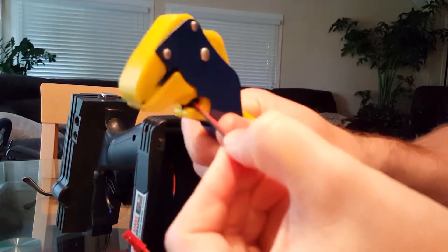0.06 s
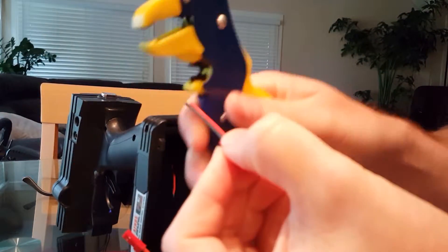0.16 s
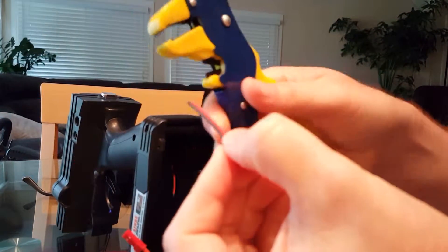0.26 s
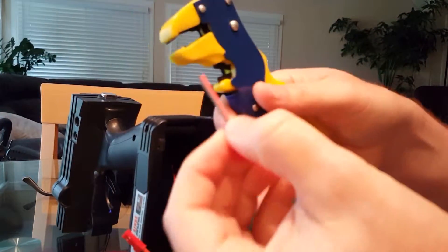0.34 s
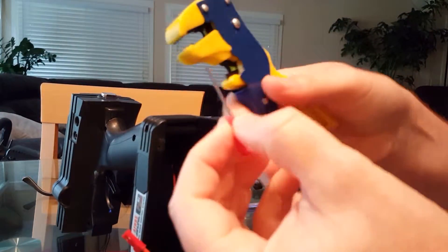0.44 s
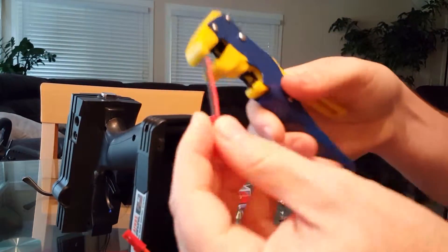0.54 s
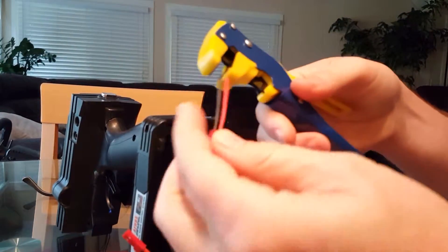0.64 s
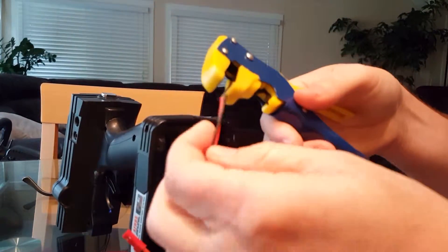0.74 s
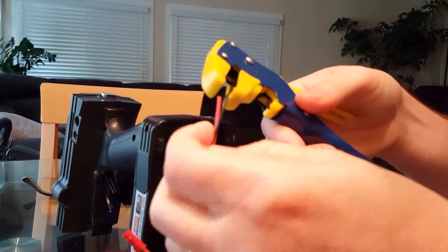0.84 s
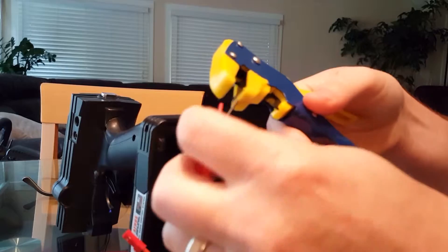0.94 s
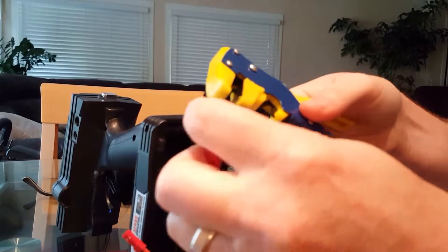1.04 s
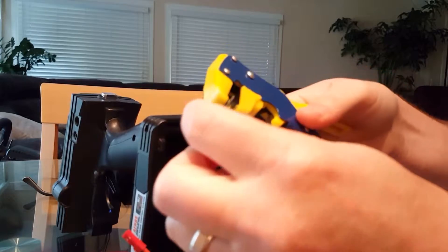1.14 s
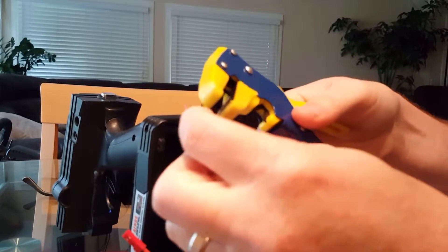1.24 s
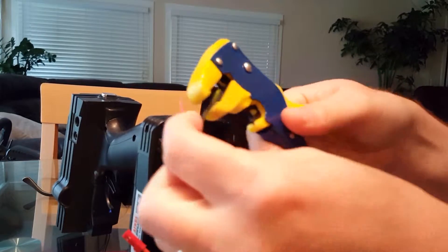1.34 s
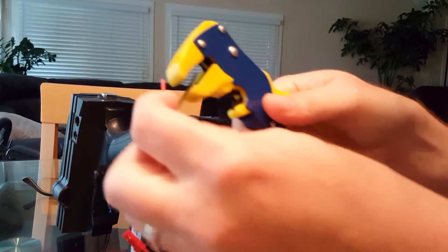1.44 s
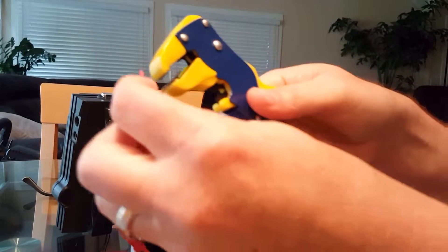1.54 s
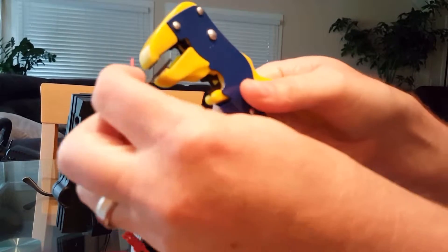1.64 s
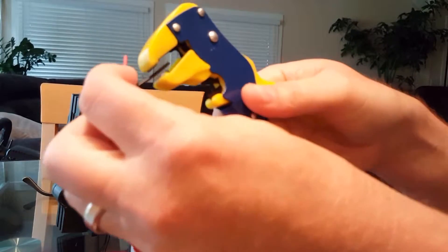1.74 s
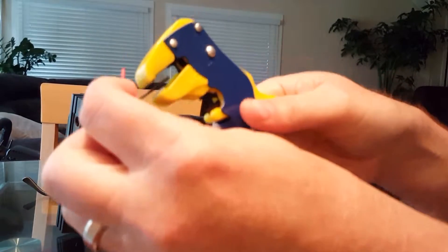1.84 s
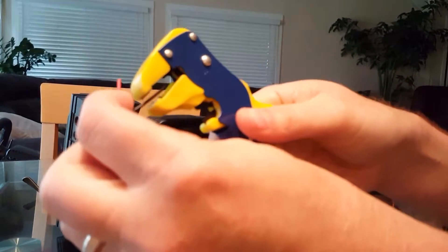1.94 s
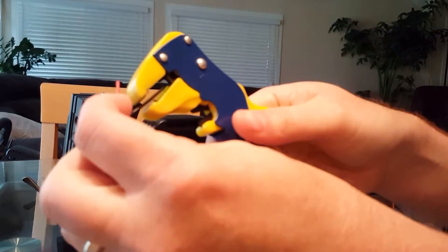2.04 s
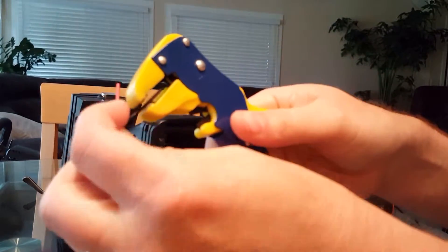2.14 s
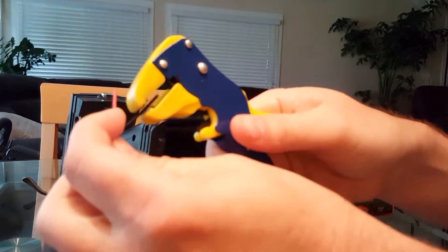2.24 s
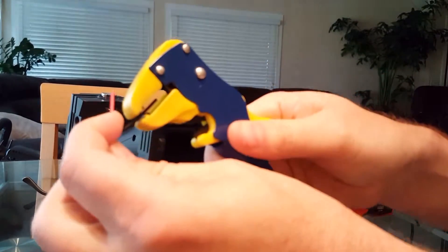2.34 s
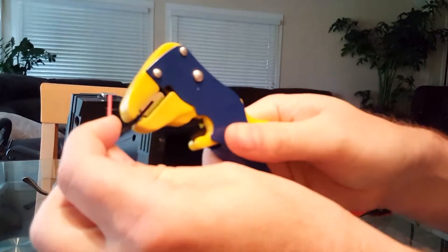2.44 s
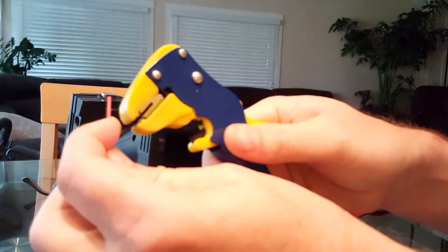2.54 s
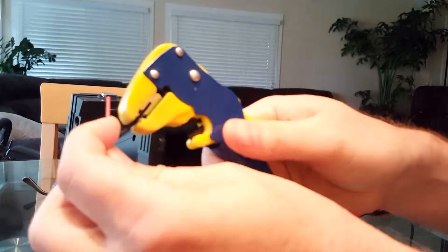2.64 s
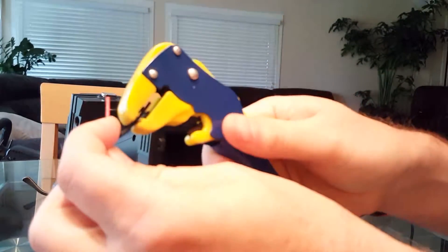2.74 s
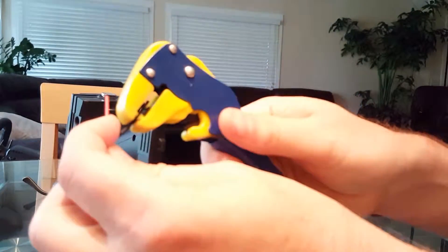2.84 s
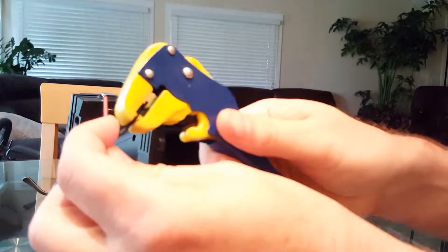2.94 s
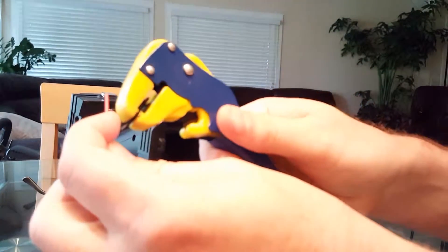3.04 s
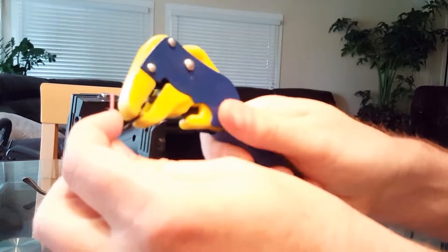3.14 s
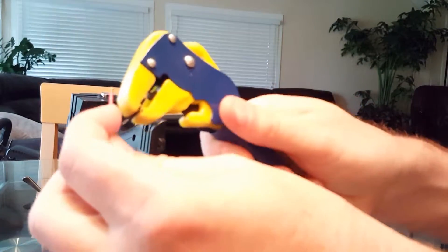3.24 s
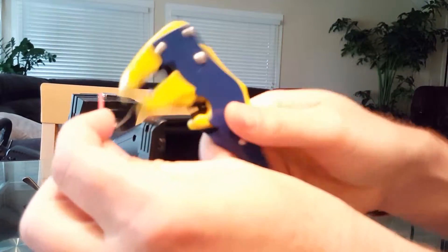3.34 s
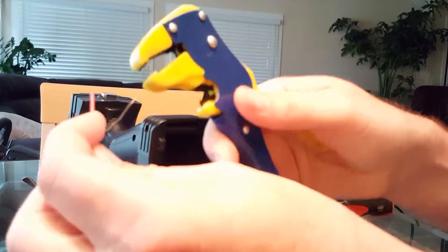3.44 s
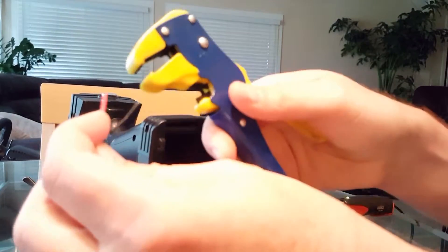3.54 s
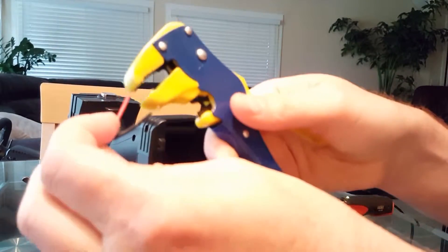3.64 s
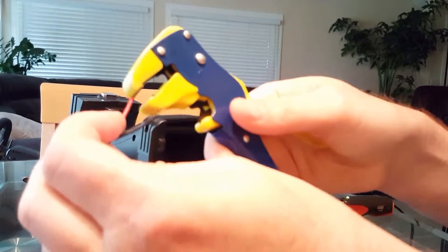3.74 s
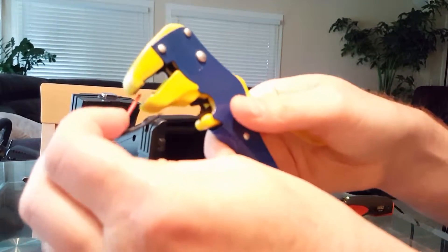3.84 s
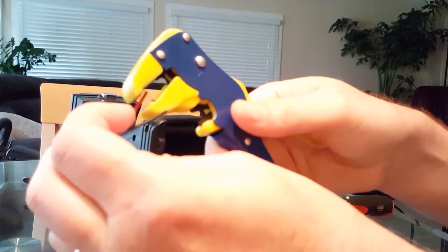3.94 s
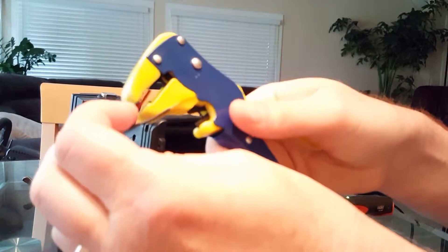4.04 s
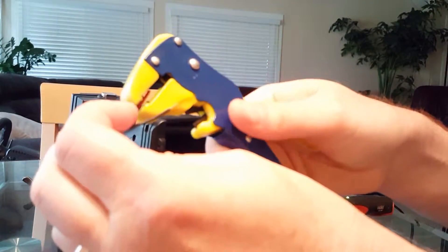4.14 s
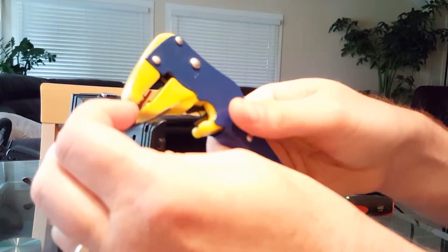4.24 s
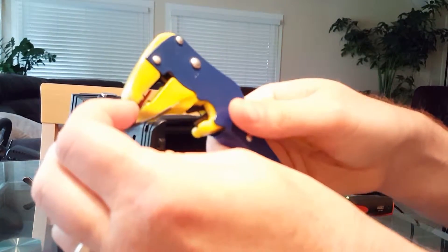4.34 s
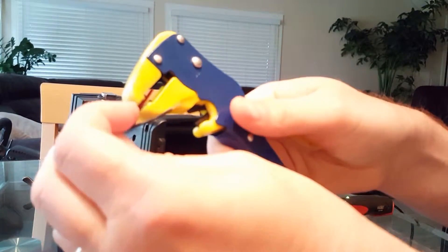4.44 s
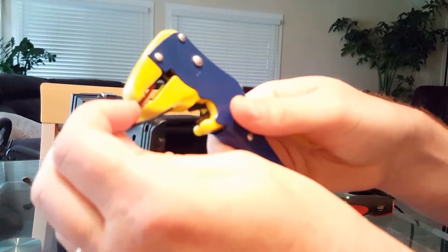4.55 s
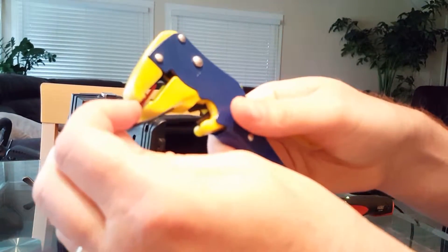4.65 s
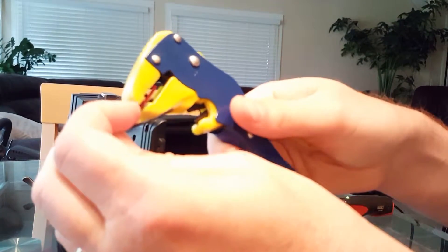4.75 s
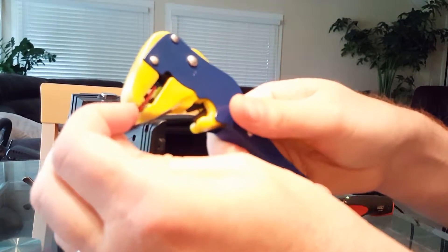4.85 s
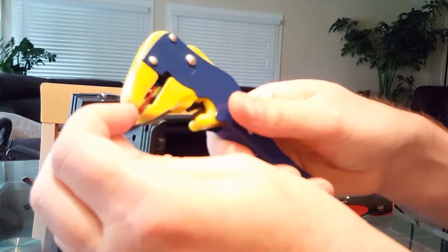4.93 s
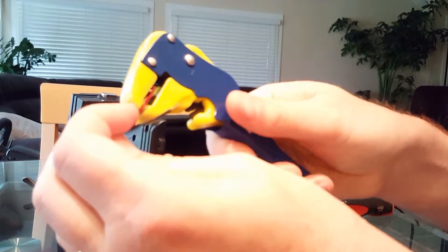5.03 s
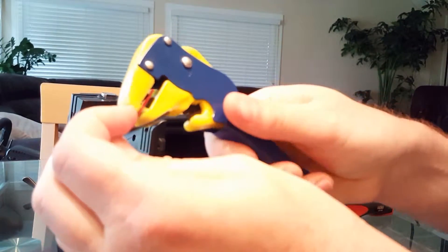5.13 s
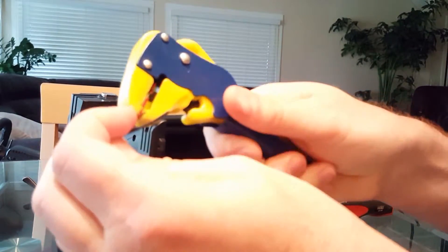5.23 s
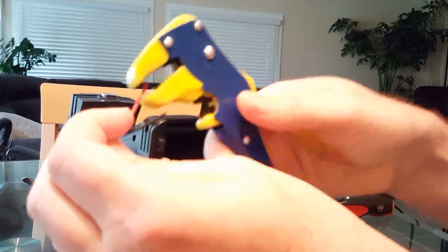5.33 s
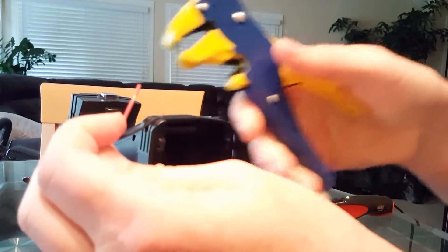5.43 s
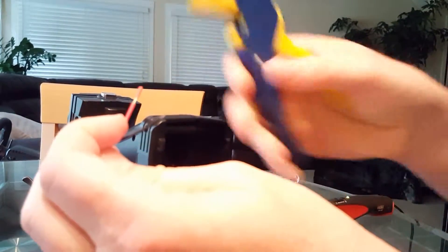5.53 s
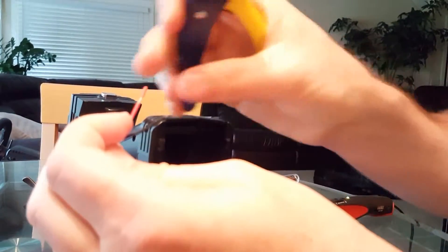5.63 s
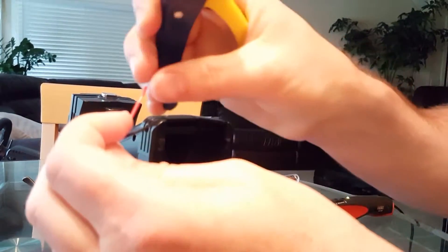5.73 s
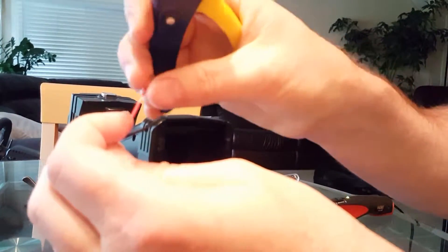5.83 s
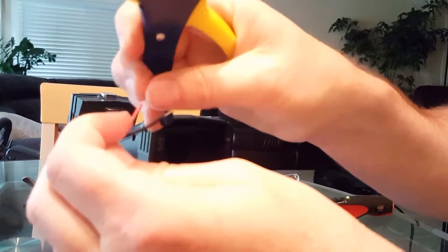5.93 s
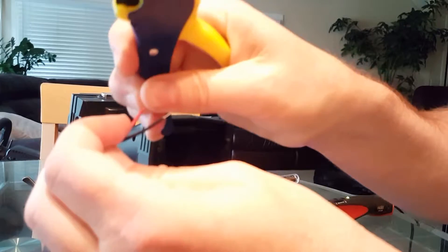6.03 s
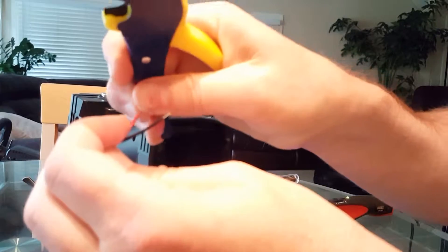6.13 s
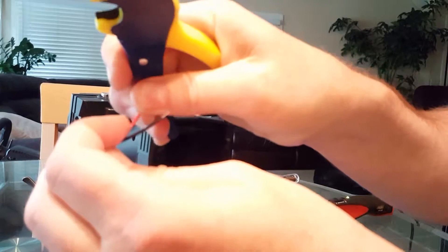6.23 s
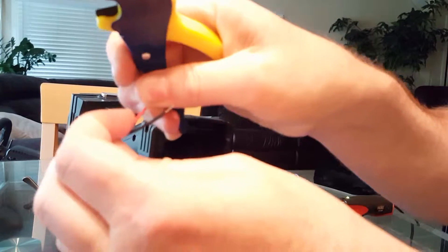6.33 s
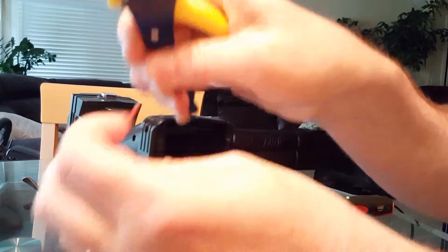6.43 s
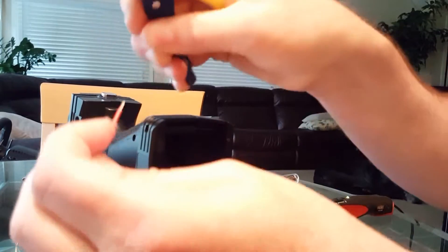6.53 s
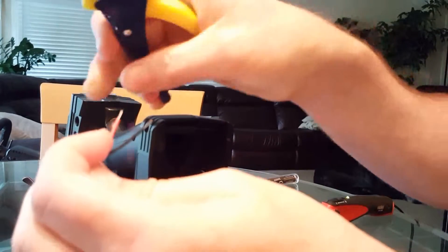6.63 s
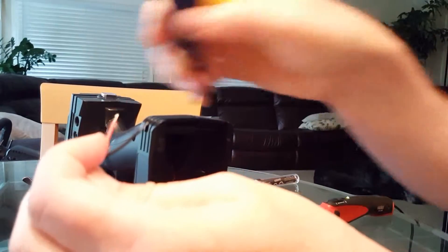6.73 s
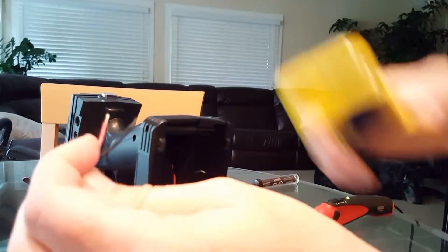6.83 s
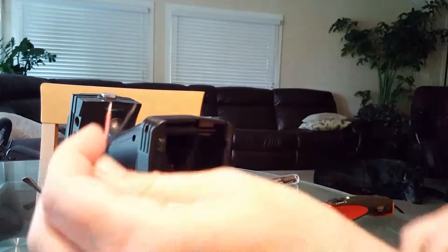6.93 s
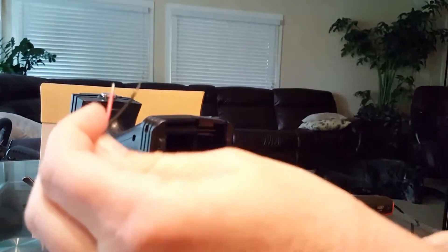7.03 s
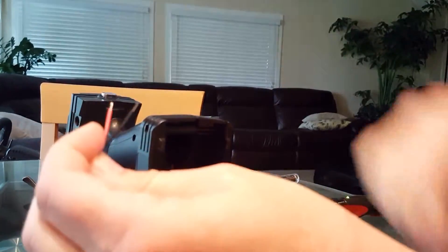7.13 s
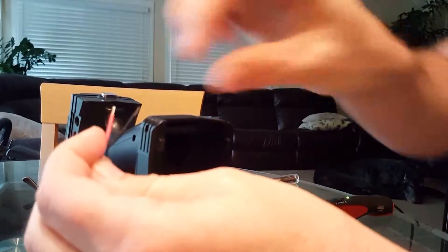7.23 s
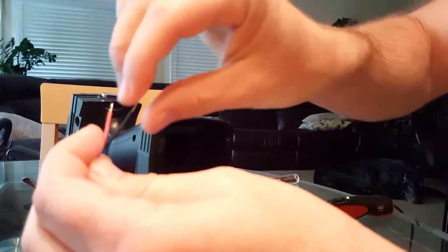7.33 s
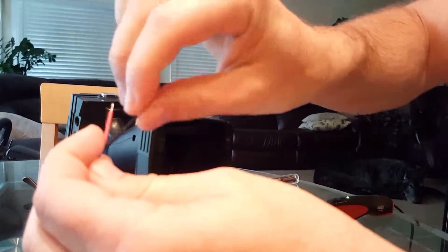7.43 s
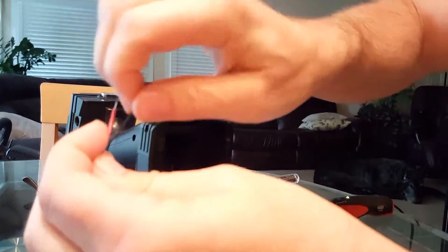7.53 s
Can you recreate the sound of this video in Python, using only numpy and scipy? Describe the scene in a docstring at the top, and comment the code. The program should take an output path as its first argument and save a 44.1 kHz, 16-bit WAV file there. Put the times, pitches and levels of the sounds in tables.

```python
"""A quiet living room, heard close up: a self-adjusting wire stripper is worked over a soft ventilation rush.
Its jaws snap through the insulation; on release a pivot squeaks, lets go, and the spring slaps them open.
Then the tool is dropped on a glass table, where it clatters and something loose rocks to rest.
Contacts are pushes with filtered noise, ringing parts are decaying sines, rubbing is a swarm of tiny slips,
the squeak is a wavering tone, and the room is a burst of early bounces with a short noise tail."""
import sys
import numpy as np
from scipy import signal
from scipy.fft import rfft, irfft
from scipy.io import wavfile
from scipy.ndimage import uniform_filter1d

SR = 44100
rng = np.random.default_rng(int(sys.argv[2]) if len(sys.argv) > 2 else 0)


def dump_mix(stems):
    """Bounce the given channels to the path in sys.argv[1] as a 16-bit WAV at rate SR."""
    frames = np.atleast_2d(stems).T  # one column per channel
    limited = np.clip(frames, -1, 1)  # hard clip at full scale
    pcm = np.round(limited * 32767).astype(np.int16)
    wavfile.write(sys.argv[1], SR, pcm)


N = 334278  # length of the scene in samples
T = np.arange(SR // 2) / SR  # time axis of one short sound, s
EDGE_HZ = 16000

# All levels are relative settings that the mix builds on; colours are spectral shapes.
# spectrum of the ventilation rush: (frequency [Hz], level [dB])
AIR_COLOUR = [(15, -49.5), (25, -14.5), (80, -12.5), (97, -11), (130, -9), (229, -6), (263, -2.5),
              (301, -5.5), (439, -9), (516, -8.5), (677, -11), (1040, -13.5), (1840, -21.5), (4140, -26.5),
              (16000, -38)]
AIR_DB = -65
# blurred ventilation hums: (frequency [Hz], width [Hz], level [dB])
VENTILATION_HUMS = [(106, 6.7, -79), (272, 37, -74), (390, 50, -78), (508, 48, -76)]
# how alike sound from all sides is in both channels: (frequency [Hz], left-right coherence [-1..1])
STEREO_LIKENESS = [(60, 0.53), (290, 0.97), (640, 0.76), (1400, -0.067), (2500, -.12), (6000, 0)]

# the grip shifts; the linkage ticks, then fingers and wire scuff along the tool:
# (time [s], tick level [dB], scuff length [s], scuff level [dB])
GRIP_SHIFTS = [(.049, -34, 0.13, -21.5), (1.429, -40.5, .06, -39), (4.549, -44, 0.022, -50.5),
               (6.494, -44.5, 0.019, -43), (6.762, -42.5, 0.19, -40.5)]
# spectrum of the small ticks: (frequency [Hz], level [dB])
TICK_COLOUR = [(200, -12.5), (1500, -4), (4000, 1), (8000, -4), (11000, -8.5), (16000, -8)]
# left-right tilt of the near tool, before each side takes its share: (frequency [Hz], left over right [dB])
NEAR_BALANCE = [(400, -1), (2900, 3), (4100, -7), (5700, 0), (7300, -6.5), (9500, -1), (15000, -5.5)]

# the jaws bite through: (time [s], level [dB], shell ring level [dB], recoil thud level [dB])
BITES = [(.0603, -14, -25.5, -44), (3.1735, -2.5, -11, -31), (5.2716, -4, -9, -24.5)]
# spectrum of the bite: (frequency [Hz], level [dB])
BITE_COLOUR = [(71, -44), (120, -19), (473, -8), (856, -18.5), (1720, -11), (2870, -11.5), (3450, -9.5),
               (4230, -2), (5300, -12), (6910, -4), (8140, -14.5), (8840, -11), (11100, -13), (14400, -20),
               (16000, -16)]

# loose steel parts clack together: (time [s], contact level [dB], rattle level [dB])
CLACKS = [(0.1267, -5.5, -20.5), (0.241, -22.5, -23.5), (.290, -48, -27), (.320, -24, -23.5),
          (.381, -54, -30), (6.782, -45, -38.5)]
# spectrum of the clack contact: (frequency [Hz], level [dB])
CLACK_COLOUR = [(88, -57.5), (150, -37), (466, -24.5), (637, -36), (774, -17.5), (1060, -34.5), (2060, -4),
                (2500, -25), (3350, -1.5), (5050, -15), (5460, -11), (10400, -7.5), (16000, -19.5)]
# spectrum of the loose parts, rattling or rubbing: (frequency [Hz], level [dB])
LOOSE_PARTS_COLOUR = [(200, -11), (750, -3), (1050, -5.5), (1400, 0), (2000, -2.5), (3000, -1), (3700, 1),
                      (5000, 1), (7000, -8.5), (11000, -9), (16000, -12.5)]
# what the steel parts ring with: (frequency [Hz], level [dB], 60 dB decay time [s])
STEEL_MODES = [(1400, -8, .1), (2590, -3, .12), (3545, -2, .1), (4658, 1, .095), (4753, -1, .11),
               (5100, -6, .11), (5809, -8, .13), (7036, -4, .08), (7962, -8, .1), (8399, -5, .1),
               (9855, -6, .11)]
# each clack rings the steel, and the parts slide on for a moment
STEEL_OVER_RATTLE_DB, SLIDE_OVER_RATTLE_DB, SLIDE_S = -1.5, -10, .11

# the spring throws the jaws open:
# (time [s], level [dB], shell ring level [dB], time since the pivot let go [s], squeak level [dB])
RETURNS = [(0.2207, -2, -7.5, 0.027, -45.5), (3.4303, -1.5, -6.5, .020, -48),
           (5.4040, -1, -8.5, .015, -46.5)]
# spectrum of the jaws hitting their stop: (frequency [Hz], level [dB])
RETURN_COLOUR = [(71, -53.5), (120, -20.5), (968, -25.5), (1750, -21.5), (2700, -24), (3170, -12.5),
                 (3520, -7), (3980, -5.5), (5630, -1), (6500, -11), (7350, -2), (11500, -16.5),
                 (12500, -11.5), (13600, -17), (16000, -9.5)]
# before each return the pivot squeaks, then lets go with a tick
SQUEAK_HZ, SQUEAK_LEAD_S, LET_GO_OVER_SQUEAK_DB = 1370, .003, 24.5

# the tool lands on the table: (time [s], tool clatter level [dB], glass level before its overall boost [dB],
# dull knock level [dB], time between rebounds [s], loss per rebound [dB])
LANDINGS = [(6.9952, 0.5, -4.5, -7, 0.0087, 6.5), (7.158, -20.5, -7.5, -13.5, .01, 11),
            (7.1638, -0.5, 3.5, -12, .0048, 2.5)]
# spectrum of the tool's clatter: (frequency [Hz], level [dB])
TOOL_COLOUR = [(50, -29.5), (130, -16.5), (250, -12.5), (480, -12.5), (800, -9), (1100, -4.5), (1750, -9),
               (2400, -14.5), (3400, -10), (5000, -1), (7000, -13.5), (10000, -9), (12500, -15),
               (16000, -20.5)]
# spectrum of the glass chatter: (frequency [Hz], level [dB])
GLASS_COLOUR = [(100, -29.5), (500, -18.5), (800, -6), (1300, -1), (1850, 4), (2400, -1.5), (2900, 3.5),
                (4200, -11.5), (7000, -6.5), (11000, -30.5), (16000, -28)]
# spectrum of the dull table knock: (frequency [Hz], level [dB])
KNOCK_COLOUR = [(60, -22), (180, -8), (330, -0.5), (500, 1), (800, -4), (2000, -17), (16000, -49)]
# what the glass top rings with: (frequency [Hz], level [dB], 60 dB decay time [s])
GLASS_MODES = [(587, -9, .2), (780, -4, .14), (911, -4, .14), (1077, -5, .14), (1251, 1.5, .23),
               (1514, -4, .13), (1704, 2, .12), (1783, 6, .09), (1950, 1, .07), (2107, -2, .12),
               (2202, -6, .13), (2586, -4, .12), (2785, -3, .21), (2856, 2, .13), (3140, -2, .13),
               (3570, 0, .12)]
GLASS_BOOST_DB = 1.5

# what the loose piece rings with: (frequency [Hz], level [dB], 60 dB decay time [s])
ROCK_MODES = [(1715, -2, 0.029), (1754, 1, 0.047), (2000, -6.5, 0.027), (2125, -10.5, 0.035),
              (2620, -16, 0.034), (3630, -23, .04)]
# it rocks on the glass: each swing is shorter and weaker by a fixed share, until it settles flat
ROCK_START_S, ROCK_FIRST_SWING_S, ROCK_SWING_SHARE = 7.3398, .0548, .714
ROCK_DB, ROCK_LOSS_DB, SETTLE_DB = -24, 3.5, -40
ROCK_RISE_S = 0.001  # small and soft, so its knocks start gently

# how long the room tail lasts: (frequency [Hz], 60 dB decay time [s])
ROOM_T60 = [(100, 0.21), (400, 0.18), (1500, 0.18), (5500, 0.22), (10000, .2), (16000, .17)]
# spectrum of the room tail: (frequency [Hz], level [dB])
ROOM_COLOUR = [(100, -5.5), (500, -3), (1800, -2), (3300, -2), (6000, -3), (9000, -3.5), (15000, 0.5)]
# spectrum of the early bounces: (frequency [Hz], level [dB])
BOUNCE_COLOUR = [(100, -7.5), (500, -6.5), (1100, -7), (1800, -9), (3000, -4.5), (3800, 2), (5000, -6.5),
                 (9000, -6), (15000, -8.5)]


def amp(db):
    """Decibels to gain."""
    return 10 ** (np.asarray(db) / 20)


def unit(x):
    """Scales each channel to energy 1."""
    return x / np.sqrt(np.sum(x ** 2, axis=-1, keepdims=True) + 1e-20)


def read(points, hz):
    """Reads a table joined by straight lines on a log-frequency axis."""
    f, value = np.transpose(points)
    return np.interp(np.log(hz + 1), np.log(f + 1), value)


def bins(x):
    """Frequencies of the spectrum of x."""
    return np.fft.rfftfreq(x.shape[-1], 1 / SR)


def add(mix, s, sound):
    """Lays a sound into the mix at time s, cutting it at the end."""
    part = mix[:, round(s * SR):][:, :sound.shape[-1]]
    part += sound[..., :part.shape[-1]]


def tint(x, colour, power=1, size=4096):
    """Minimum-phase filter with the given spectrum, so that attacks stay sharp; power scales its dB."""
    hz = abs(np.fft.fftfreq(size, 1 / SR))
    log_gain = power * np.log(amp(np.maximum(read(colour, hz), -90)))
    spectrum = np.exp(np.conj(signal.hilbert(log_gain)))
    taps = np.fft.ifft(spectrum).real[:size // 2]
    return signal.oaconvolve(x, taps[None], axes=1)[:, :x.shape[-1]]


def band(x, hz, width):
    """One resonance of the given width in Hz."""
    return unit(signal.lfilter(*signal.iirpeak(hz, hz / width, fs=SR), x))


def diffuse(x):
    """Sound from all sides: blends two independent signals to the tabled left-right likeness."""
    a, b = rfft(x)
    angle = np.arccos(np.clip(read(STEREO_LIKENESS, bins(x)), -1, 1)) / 2
    shared, opposed = np.cos(angle) * a, np.sin(angle) * b
    return irfft([shared + opposed, shared - opposed], x.shape[-1])


def diffuse_noise(length):
    """White noise from all sides."""
    return diffuse(rng.standard_normal((2, length)))


def chatter(t60):
    """Countless small resonances dying together, as decaying noise."""
    return unit(diffuse_noise(len(T)) * amp(-60 * T / t60))


def snap(colour, t60, buzz_db, buzz_hz=2200):
    """One hard contact: a single push, and a brief buzz of the small parts above buzz_hz."""
    buzz = signal.lfilter(*signal.butter(2, buzz_hz, "high", fs=SR), chatter(t60))
    contact = signal.unit_impulse(len(T)) + amp(buzz_db) * buzz
    # the contact feeds all frequencies evenly; the colour belongs to the struck part
    power = uniform_filter1d(np.mean(abs(rfft(contact)) ** 2, axis=0), size=150)
    flattening = np.column_stack([bins(contact), -10 * np.log10(power + 1e-9)])
    return unit(tint(tint(contact, flattening), colour))


def ring(modes, blows, rise=0.0004, lag=0.00015):
    """Modes fed by blows (s, dB): energies pile up and drain away; the left waves lag in phase."""
    start = blows[0][0]
    t = np.arange(round((blows[-1][0] - start) * SR) + len(T)) / SR
    feed = np.zeros(len(t))
    for s, db in blows:
        feed[round((s - start) * SR)] += amp(db) ** 2
    supply = signal.lfilter([1], [1, -np.exp(-1 / (rise * SR))], feed)
    ear_time = t - np.array([[lag], [0]])  # left, right
    out = np.zeros((2, len(t)))
    for hz, db, t60 in modes:
        keep_per_sample = amp(-120 / (t60 * SR))  # an energy share, hence 120 for 60 dB
        energy = signal.lfilter([1], [1, -keep_per_sample], supply + 1e-30)
        out += amp(db) * np.sqrt(energy) * np.sin(2 * np.pi * (hz * ear_time + rng.random()))
    return np.sqrt(feed.sum()) * unit(out)


def air():
    """Steady ventilation rush of shaped noise, with hums of narrow noise bands."""
    noise = diffuse_noise(N)
    hz = bins(noise)
    out = amp(AIR_DB) * unit(irfft(rfft(noise) * amp(read(AIR_COLOUR, hz)), N))
    for centre, width, db in VENTILATION_HUMS:
        resonance = 1 / (1 + ((hz - centre) / width * 2) ** 2)
        out += amp(db) * unit(irfft(rfft(diffuse_noise(N)) * resonance, N))
    return np.sqrt(N) * out  # from energy 1 to RMS 1


def ticks():
    """The linkage ticks as the grip shifts, and the pivot ticks as it lets go before each return."""
    out = np.zeros((2, N))
    grips = [(s, db) for s, db, *_ in GRIP_SHIFTS]
    let_go = [(s - travel, db + LET_GO_OVER_SQUEAK_DB) for s, _, _, travel, db in RETURNS]
    for s, db in grips + let_go:
        add(out, s, amp(db) * snap(TICK_COLOUR, t60=0.018, buzz_db=12.0))
    return out


def scuffs(per_s=2000, spread_db=1.5):
    """Rubbing is a swarm of tiny slips, a few of them larger, sounding through the loose parts."""
    out = np.zeros((2, N))
    rubs = [(s, length, db) for s, _, length, db in GRIP_SHIFTS]
    slides = [(s, SLIDE_S, db + SLIDE_OVER_RATTLE_DB) for s, _, db in CLACKS]
    for s, length, db in rubs + slides:
        sizes = amp(spread_db * np.minimum(rng.exponential(1, len(T)), 4))
        slips = (rng.random(len(T)) < per_s / SR) * sizes
        swell = np.sin(np.pi * np.minimum(T / length, 1))
        rub = diffuse(rng.standard_normal((2, len(T))) * slips * swell)
        add(out, s, amp(db) * unit(tint(rub, LOOSE_PARTS_COLOUR)))
    return out


def bites():
    """The jaws snap through the insulation: a hard contact, and a low resonant thud as the hands jerk."""
    out = np.zeros((2, N))
    for s, db, _, thud_db in BITES:
        add(out, s, amp(db) * snap(BITE_COLOUR, t60=0.011, buzz_db=8.0))
        thud = band(band(chatter(t60=.3), hz=110, width=120), hz=110, width=120)
        add(out, s, amp(thud_db) * thud)
    return out


def shell():
    """The plastic housing rings low with shut jaws and higher with open ones, as pushed resonances."""
    out, push = np.zeros((2, N)), signal.unit_impulse(len(T))
    shut = band(band(push, hz=3620, width=900), hz=3620, width=900)
    overtone = amp(-8) * band(band(push, hz=6500, width=1100), hz=6500, width=1100)
    opened = band(band(push, hz=5840, width=1100), hz=5846, width=1100)
    for s, _, db, _ in BITES:
        add(out, s, amp(db) * (shut + overtone))
    for s, _, db, *_ in RETURNS:
        add(out, s, amp(db) * opened)
    return out


def clacks():
    """Loose steel parts knock together: a hard contact, a noisy rattle and ringing steel modes."""
    out = np.zeros((2, N))
    for s, db, rattle_db in CLACKS:
        add(out, s, amp(db) * snap(CLACK_COLOUR, t60=.016, buzz_db=8.5))
        rattle = unit(tint(chatter(t60=0.12), LOOSE_PARTS_COLOUR))
        steel = ring(STEEL_MODES, [(s, STEEL_OVER_RATTLE_DB)])
        add(out, s, amp(rattle_db) * (rattle + steel))
    return out


def squeak(hz, rise=0.0033, fall=.006, glide=3., waver=.025):
    """A short stick-slip tone that swells and rises in pitch, loudest in its middle."""
    t = np.arange(-SR // 20, SR // 20) / SR
    wander = uniform_filter1d(rng.standard_normal(len(t)), size=60)
    pitch = hz * (1 + glide * t + waver * wander / wander.std())
    swell = np.exp(np.minimum(t / rise, -t / fall))
    return swell * np.sin(2 * np.pi * np.cumsum(pitch) / SR)


def squeaks():
    """The pivot sticks and slips just before it lets go, one tone per return."""
    out = np.zeros((2, N))
    for s, _, _, travel, db in RETURNS:
        tone = squeak(SQUEAK_HZ)
        loudest_s = s - travel - SQUEAK_LEAD_S
        add(out, loudest_s - len(tone) / 2 / SR, amp(db) * tone)
    return out


def returns(lead=.001):
    """The spring slaps the jaws open: the slide touches first, then the jaw hits its stop."""
    out = np.zeros((2, N))
    for s, db, *_ in RETURNS:
        add(out, s - lead, amp(db - 10) * snap(RETURN_COLOUR, t60=0.0048, buzz_db=10))
        add(out, s, amp(db) * snap(RETURN_COLOUR, t60=0.011, buzz_db=-1.5))
    return out


def stripper():
    """The tool in the hand, near the right microphone: its hard contacts are tilted between the sides."""
    contacts = ticks() + bites() + returns()
    left = tint(contacts[:1], NEAR_BALANCE, power=.5)
    right = tint(contacts[1:], NEAR_BALANCE, power=-0.37)
    return np.vstack([left, right]) + clacks() + squeaks() + scuffs()


def rebounds(count=4):
    """Each landing chatters in evenly spaced, weakening contacts: rows (s, tool dB, glass dB, knock dB)."""
    contacts = []
    for s, tool_db, glass_db, knock_db, gap, loss_db in LANDINGS:
        for k in range(count):
            lost = k * loss_db
            contacts.append((s + k * gap, tool_db - lost, glass_db + GLASS_BOOST_DB - lost, knock_db - lost))
    return sorted(contacts)


def landings():
    """Each contact knocks the table, shakes the tool and rings the glass: coloured noise, snaps and modes."""
    out = np.zeros((2, N))
    contacts = rebounds()
    for s, tool_db, glass_db, knock_db in contacts:
        clatter = unit(tint(chatter(t60=0.076), TOOL_COLOUR))
        tool = clatter + amp(-13) * snap(TOOL_COLOUR, t60=.01, buzz_db=-3.0)
        glass = unit(tint(chatter(t60=0.062), GLASS_COLOUR))
        knock = snap(KNOCK_COLOUR, t60=0.031, buzz_db=7.5, buzz_hz=200)
        add(out, s, amp(tool_db) * tool + amp(glass_db) * glass + amp(knock_db) * knock)
    s, tool_db, glass_db, _ = np.transpose(contacts)
    add(out, s[0], amp(-4.0) * ring(STEEL_MODES, np.column_stack([s, tool_db])))
    add(out, s[0], ring(GLASS_MODES, np.column_stack([s, glass_db])))
    return out


def rocking(count=9):
    """A loose piece rocks on the glass: knocks come ever faster and fainter, then a last one as it lies flat."""
    duration = ROCK_FIRST_SWING_S / (1 - ROCK_SWING_SHARE)  # sum of the endless series of swings
    knocks = [(ROCK_START_S + duration * (1 - ROCK_SWING_SHARE ** k), ROCK_DB - k * ROCK_LOSS_DB)
              for k in range(count)]
    out = np.zeros((2, N))
    for s, db in knocks + [(ROCK_START_S + duration, SETTLE_DB)]:
        add(out, s, ring(ROCK_MODES, [(s, db)], rise=ROCK_RISE_S))
    return out


def table():
    """The glass table: the tool lands, then the rocking dies away, all slightly to the right."""
    return (landings() + rocking()) * amp([[-.5], [.5]])


def room(x, tail_db, bounce_db, bounce_s=0.0065, onset_s=0.0056):
    """A cluster of early bounces off the table, then a short tail in a furnished room, as shaped noise."""
    hz, t, z = signal.stft(diffuse_noise(len(T)), SR, nperseg=256)
    decay = amp(-60 * t / read(ROOM_T60, hz)[:, None])
    tail = signal.istft(z * decay, SR, nperseg=256)[1][:, :len(T)]
    tail = unit(tail * np.clip(T / onset_s - 1, 0, 1))  # silent until onset_s, full at twice that
    bounce = unit(diffuse_noise(len(T)) * np.exp(-((T - bounce_s) / .0015) ** 2))
    response = amp(tail_db) * tint(tail, ROOM_COLOUR) + amp(bounce_db) * tint(bounce, BOUNCE_COLOUR)
    return signal.fftconvolve(x, response, axes=1)[:, :N]


def scene():
    """Near tool and farther table in the same room."""
    near, housing, far = stripper(), shell(), table()
    # the housing radiates sideways: little of it arrives directly, all of it feeds the room
    direct = near + far + housing * amp([[-14], [-5]])
    near_room = room(near + housing, tail_db=-10, bounce_db=-7.5)
    far_room = room(far, tail_db=-7.0, bounce_db=-4.0)
    return air() + direct + near_room + far_room


def record(dry):
    """Cuts the extreme treble with a steep low-pass."""
    taps = signal.firwin(255, EDGE_HZ, window=("kaiser", 8), fs=SR)
    return signal.oaconvolve(dry, taps[None], "same")


dry = scene()
out = record(dry)
dump_mix(out)
```